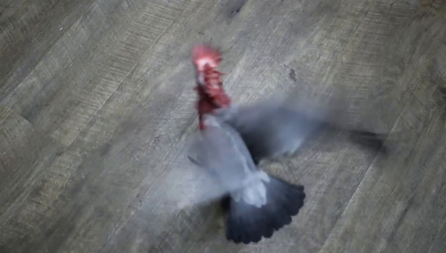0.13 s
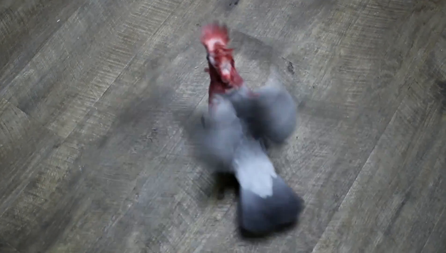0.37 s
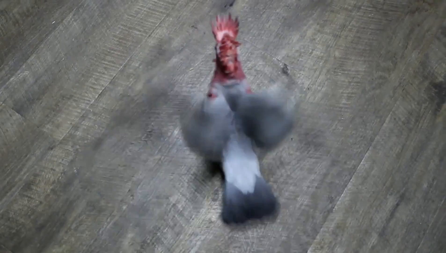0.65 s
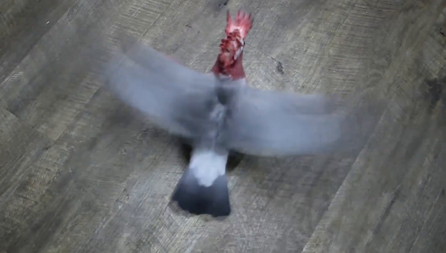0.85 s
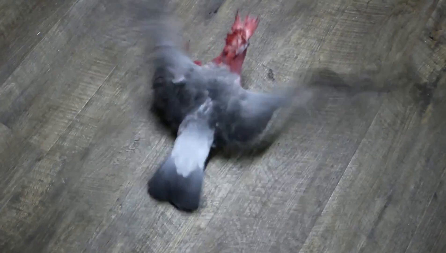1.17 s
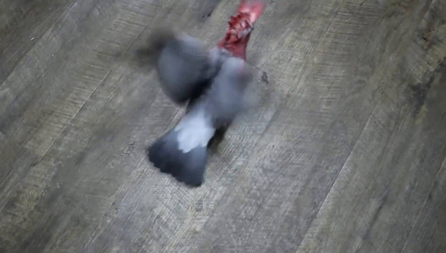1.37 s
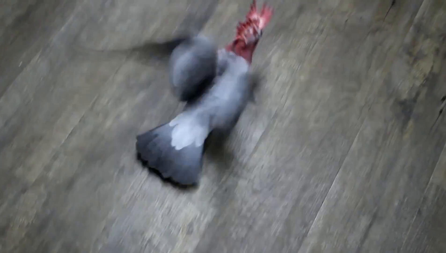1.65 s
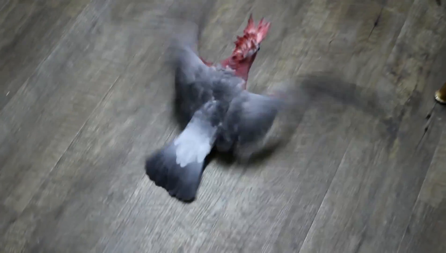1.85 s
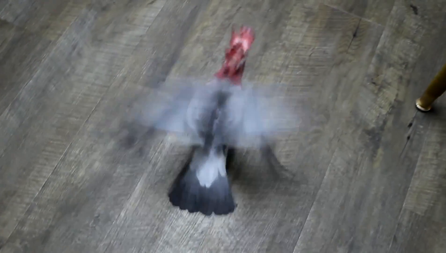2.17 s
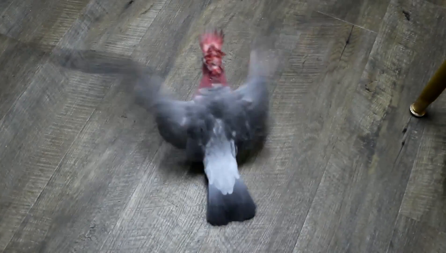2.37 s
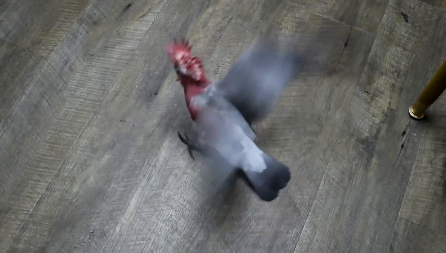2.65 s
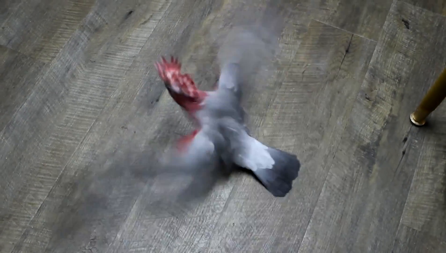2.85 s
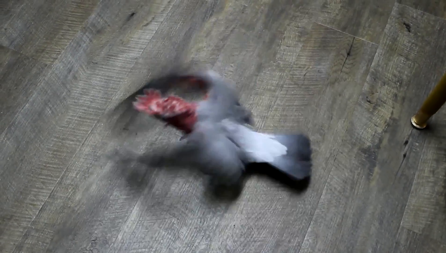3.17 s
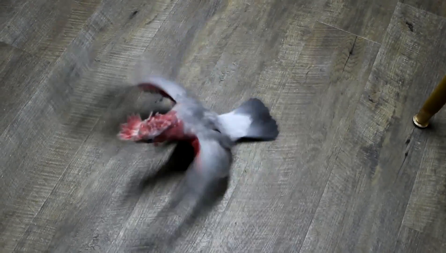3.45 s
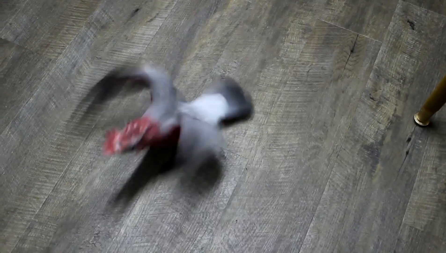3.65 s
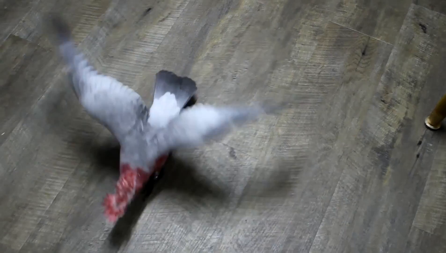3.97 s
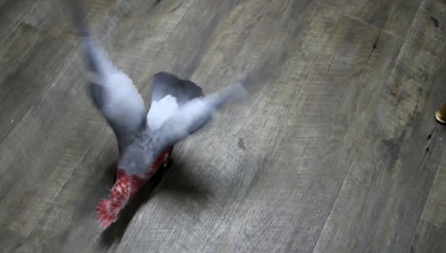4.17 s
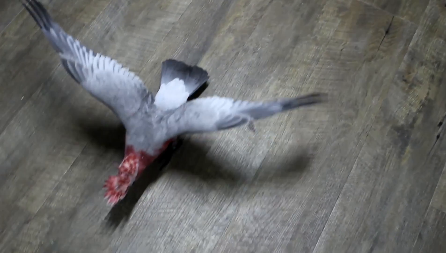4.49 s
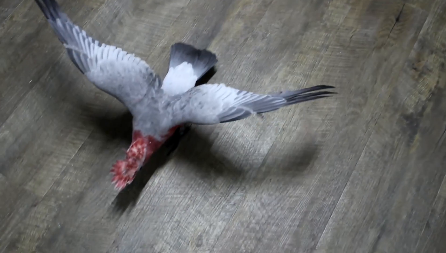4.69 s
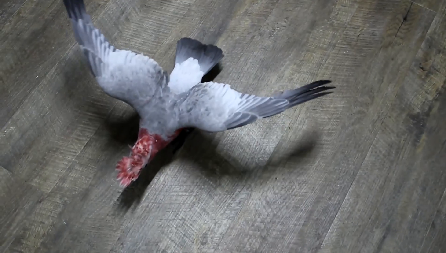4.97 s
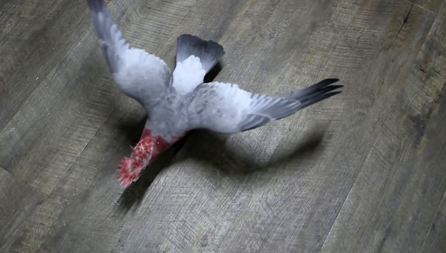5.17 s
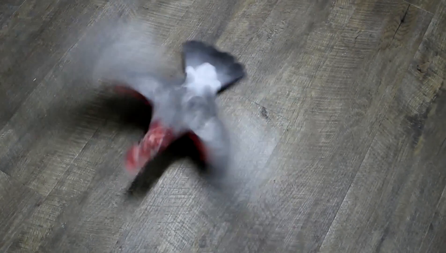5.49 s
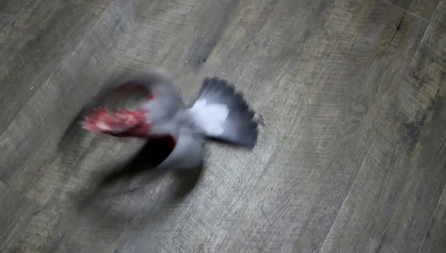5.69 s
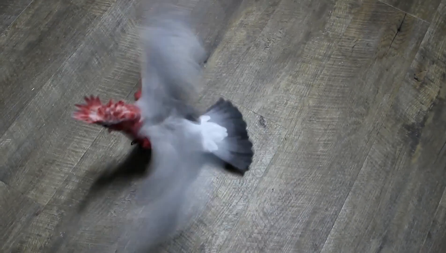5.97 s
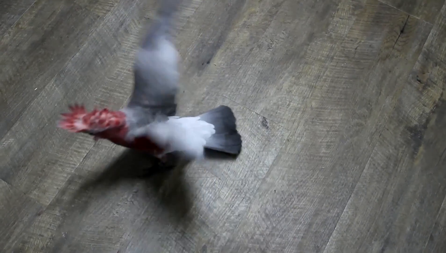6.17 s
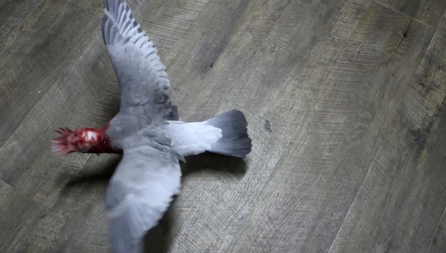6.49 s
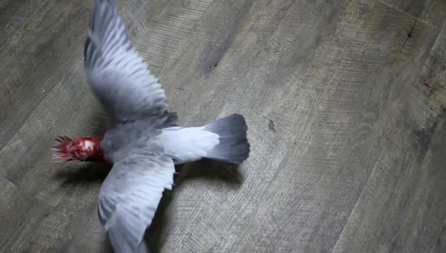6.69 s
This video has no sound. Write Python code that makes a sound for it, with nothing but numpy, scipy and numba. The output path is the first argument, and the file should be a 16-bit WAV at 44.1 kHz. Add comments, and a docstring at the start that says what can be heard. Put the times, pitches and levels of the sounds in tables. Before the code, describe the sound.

Shrill, cracking parrot screeches and quick feathery wing flaps indoors, then a quiet pause, a last rasping squawk and light floor taps.

```python
"""In a bare, ringing room, a young parrot squawks and beats its wings on the wooden floor.
Its voice is a whistle near 3 kHz, built from harmonics, that breaks into half and quarter pitch and rasps.
Wing beats are shaped noise, taps of a wing tip or claws are clicks that ring the boards; an appliance
hums far off. The recorder turns its gain down under the squawks and lets it creep back in the pauses."""
import sys
import numpy as np
from scipy import signal
from scipy.fft import rfft, irfft
from scipy.io import wavfile
from scipy.ndimage import uniform_filter1d, minimum_filter1d
from numba import njit

SR = 44100
rng = np.random.default_rng(int(sys.argv[2]) if len(sys.argv) > 2 else 0)


def wrap_up_sound(samples):
    """Save the sound to the file named by the first command line argument, as 16-bit audio."""
    columns = np.atleast_2d(samples).T
    # keep every value between -1 and 1, then stretch to whole-number steps
    tamed = np.clip(columns, -1, 1)
    steps = np.round(tamed * 32767).astype(np.int16)
    wavfile.write(sys.argv[1], SR, steps)


N = 301644
LEAD = SR // 2   # samples of run-up
TIME = np.arange(-LEAD, N) / SR   # s; sound from just before the start still rings in the room
CUTOFF_HZ = 15687   # top of the voice's harmonics and of the recorder

# room tone, relative spectrum: (f/Hz, level/dB per Hz); AIR_DB is its overall level
AIR = [(15, -47), (25, -4.5), (172, -26.5), (202, -22.5), (394, -12), (543, -18), (588, -23.5), (769, -19),
       (4620, -32), (9520, -35), (15000, -52.5)]
AIR_DB = -71.5
# hum lines of the appliance: (f/Hz, width/Hz, level/dB)
HUM = [(204.6, 15, -77), (540, 1, -69.5), (2342, 40, -90), (4700, 40, -89.5), (9825, 60, -90)]

# registers of the voice, the whistle being the 4th harmonic of a slower cycle, all relative to the squawk:
# (whistle level/dB, its octave level/dB, half-pitch level/dB, quarter-pitch level/dB,
#  lowest tones level/dB, rasp level/dB)
CLEAN = (1, -10, -18, -50, -73, -47)
HALVED = (-0.5, -5, -2, -34, -60.5, -25)
QUARTERED = (1.5, -7.5, -7.5, -2.5, -39, -14)
HARSH = (-18, -17.5, -1, 3.5, -34, 8.5)
FULL = (-5.5, -10.5, -14.5, 2.5, -9, -4)
CRACKED = (-17, -9, -16.5, -4.5, -33.5, -22.5)
CROAK = (-10, -13, -13.5, -5, -7.5, -6.5)
DULLING = 0.2   # dB lost by the octave and half-pitch families per dB below the squawk's peak
# squawks: (octave lift/dB, lowest tones lift/dB, [(t/s, cycle f/Hz, level/dB, register)]);
# the voice glides from row to row
SQUAWKS = [ (11.5, 12, [(-.2, 748, 2.5, HARSH), (-.03, 737.4, -19, QUARTERED), (.02, 720, -29.5, HARSH)]),
           (-3.5, -4.5, [(.213, 542, -28, HALVED), (.243, 743, -7.5, HALVED), (.29, 780.5, -7.5, HALVED),
           (.33, 800.5, -10, HALVED), (.345, 800, -7.5, QUARTERED), (.365, 750, -6.5, CRACKED),
           (.385, 791.6, -15.5, HARSH), (.405, 784, -19, QUARTERED), (.435, 723, -44, QUARTERED)]),
           (7.5, 7.5, [(1.006, 603, -17.5, HARSH), (1.03, 657.5, -14, HALVED), (1.05, 733, -18, HALVED),
           (1.09, 689, -17.5, HALVED), (1.155, 643.4, -21.5, HALVED), (1.188, 512, -30, HALVED)]),
           (14, -0.5, [(1.184, 436, -28, HALVED), (1.22, 424.3, -37.5, HALVED),
           (1.29, 425.5, -35.5, HALVED)]), (3, -2.5, [(1.46, 670, -31.5, HARSH), (1.48, 684.6, -15.5, FULL),
           (1.5, 727, -9.5, CRACKED), (1.516, 784, -9.5, CLEAN), (1.56, 800, -10, CLEAN),
           (1.6, 778, -19, CLEAN), (1.665, 753.7, -7, CLEAN), (1.678, 692, -13.5, CLEAN),
           (1.692, 557, -32.5, CLEAN)]), (6, -5.5, [(1.888, 598, -31, QUARTERED),
           (1.903, 682.4, -12, CLEAN), (1.925, 750.2, -7.5, CLEAN), (1.97, 793.4, -14, QUARTERED),
           (2.02, 775.4, -3.5, CLEAN), (2.035, 744, -19.5, FULL), (2.075, 741.6, -22, CROAK),
           (2.14, 696, -27, CROAK)]), (-1.5, 2.5, [(2.742, 646, -36, HARSH), (2.765, 742.7, -11, HALVED),
           (2.8, 779.4, -5, CLEAN), (2.82, 777, -31.5, CLEAN), (2.845, 793.7, -14, CLEAN),
           (2.872, 786.4, -12.5, CLEAN), (2.885, 774, -10.5, CRACKED), (2.905, 707, -44, HARSH),
           (2.96, 659, -26, CROAK)]), (0.5, 5, [(3.122, 668.5, -40, HARSH), (3.145, 744.2, -10, QUARTERED),
           (3.17, 776.6, -12.5, QUARTERED), (3.2, 775.6, -17.5, QUARTERED), (3.25, 790, -18.5, QUARTERED),
           (3.28, 737, -35.5, CROAK), (3.31, 743, -29.5, CROAK), (3.35, 710, -29, CROAK)]),
           (1, 3, [(3.833, 596, -25, CROAK), (3.85, 651, -21, QUARTERED), (3.875, 708, -13, QUARTERED),
           (3.92, 734, -21, QUARTERED), (3.97, 754.4, -14, QUARTERED), (4.0, 759.6, -33.5, HARSH),
           (4.05, 722, -30, CROAK)]), (1, 1, [(5.496, 577, -44.5, FULL), (5.508, 630, -25.5, FULL),
           (5.52, 693, -27, FULL), (5.53, 738.5, -18.5, QUARTERED), (5.57, 715, -24, HALVED),
           (5.61, 712, -29.5, CLEAN), (5.625, 708, -18, CRACKED), (5.66, 650, -24, CRACKED),
           (5.685, 617, -32, QUARTERED)]), (0, 12.5, [(5.655, 558, -48, HARSH), (5.72, 561.4, -48.5, HARSH),
           (5.92, 566.6, -59, HARSH)])]
# resonances of the throat: (f/Hz, level/dB)
THROAT = [(150, -59), (600, -25.5), (1500, -14.5), (2200, -25.5), (3000, 8), (3800, 3), (6000, -11),
          (7000, -6.5), (9000, -20), (11000, -31), (15000, -63)]

# reverberation of the room: (f/Hz, t60/s); ROOM_DB is its level against the direct sound
ROOM = [(300, .48), (1300, .52), (3500, .56), (6000, .55), (9000, .47), (15000, .3)]
ROOM_DB = -5

# wing beats, before the stroke's envelope: (t/s, air puff level/dB, feather swish level/dB)
BEATS = [(.2, -32, -33), (.341, -56, -62), (.499, -50, -38.5), (.631, -41, -38), (.752, -34, -38.5),
         (.898, -36, -42), (.929, -53, -50.5), (1.009, -38.5, -47), (1.185, -45, -50.5), (1.34, -36, -37.5),
         (1.464, -39.5, -40), (1.6, -58.5, -49.5), (1.729, -47, -39.5), (1.87, -37, -56),
         (1.989, -53, -57.5), (2.121, -48, -50), (2.242, -40.5, -43.5), (2.39, -46, -46),
         (2.59, -46.5, -47), (2.75, -44, -64), (2.89, -76, -42), (3.024, -47.5, -39), (3.119, -56.5, -43.5),
         (3.369, -58.5, -42.5), (3.498, -46.5, -48.5), (3.645, -48.5, -45), (3.83, -57, -38),
         (4.025, -119.5, -33.5), (5.372, -52, -41), (5.407, -54.5, -45), (5.87, -50, -44),
         (5.956, -62, -59)]
BEAT_S = .035   # time constant of a stroke's decay
# relative spectrum of the air puff: (f/Hz, level/dB per Hz)
PUFF = [(40, -13.5), (100, -10), (200, -3.5), (350, -1), (600, -18.5), (1500, -11.5), (3000, -31.5)]
# relative spectrum of the feather swish: (f/Hz, level/dB per Hz)
SWISH = [(180, -62.5), (300, -12.5), (384, 0.5), (663, -2.5), (907, -5), (2110, -3.5), (8020, -7.5),
         (15500, -24)]
# spread wings brush the boards: (t/s, level/dB)
QUIVER = [(4.95, -99), (5.1, -66.5), (5.2, -63), (5.3, -74), (5.4, -62), (5.5, -73.5)]
# relative spectrum of that brushing: (f/Hz, level/dB per Hz)
BRUSH = [(88, -25.5), (150, -2), (404, -4.5), (532, -9), (921, -9.5), (2530, -12.5), (12000, -30.5),
         (15600, -57), (22000, -120)]

# wing tip and claws on the boards, before the gains of click and boards: (t/s, level/dB, hardness f/Hz)
TAPS = [(5.416, -59, 9000), (6.474, -49, 1542), (6.61, -62.5, 9400)]
# resonances of the floorboards: (f/Hz, level/dB, t60/s)
BOARDS = [(236.4, -21.5, .05), (390, -8, 0.06), (770, 0.5, 0.016), (1330, 2, 0.02), (1720, -5, 0.033)]


def amp(db):
    """dB to gain."""
    return 10 ** (np.asarray(db) / 20)


def rms_one(x):
    """Scale to rms 1."""
    return x / np.sqrt(np.mean(x ** 2) + 1e-20)


def at_hz(points, hz):
    """Read a spectrum table on a log-frequency axis."""
    table_hz, value = np.array(points).T
    return np.interp(np.log(np.maximum(hz, 1)), np.log(table_hz), value)


def coloured(spectrum, size=len(TIME)):
    """Noise of the given spectrum, rms 1."""
    hz = np.fft.rfftfreq(size, 1 / SR)
    white = rng.standard_normal(size)
    return rms_one(irfft(rfft(white) * amp(at_hz(spectrum, hz)), size))


def drift(hz, size=len(TIME)):
    """Random wander, rms 1: noise through a two-pole lowpass."""
    r = np.exp(-2 * np.pi * hz / SR)
    white = rng.standard_normal(size + 4000)
    return rms_one(signal.lfilter([1], [1, -2 * r, r * r], white)[4000:])   # skip the filter's settling


def ring(x, hz, width_hz):
    """A resonance; a unit click rings at about height 1."""
    r, w = np.exp(-np.pi * width_hz / SR), 2 * np.pi * hz / SR
    return signal.lfilter([0, np.sin(w)], [1, -2 * r * np.cos(w), r * r], x + 1e-18)


def room_tone():
    """Steady air noise, with hum lines made of noise through narrow resonances."""
    white = rng.standard_normal(len(TIME))
    hum = sum(amp(db) * rms_one(ring(white, hz, width_hz)) for hz, width_hz, db in HUM)
    return amp(AIR_DB) * coloured(AIR) + hum


def squawk(bright_db, deep_db, rows, jitter=.22, wobble=.007, flutter_db=4.0, edge_s=.007):
    """Harmonics of the cycle in families, plus breath noise that swells once a cycle."""
    s, cycle_hz, row_db, registers = zip(*rows)
    span = (TIME >= s[0]) & (TIME < s[-1])
    t = TIME[span]
    hz = np.interp(t, s, cycle_hz)
    whistle, octave, half, quarter, low, rasp = [
        np.interp(t, s, family + row_db) for family in np.transpose(registers)]
    dull_db = DULLING * (max(row_db) - np.interp(t, s, row_db))
    octave = octave + bright_db - dull_db
    half = half - dull_db
    low = low + deep_db

    # the more rasp, the more the cycle stumbles
    strongest = np.max([whistle, octave, half, quarter], axis=0)
    unsteady = jitter * np.clip(amp(rasp - strongest), 0, 1)
    wobbly_hz = hz * (1 + wobble * drift(30, len(t)))
    phase = 2 * np.pi * np.cumsum(wobbly_hz) / SR + unsteady * drift(330, len(t))

    out = amp(rasp) * coloured(THROAT, len(t)) * (1 + 0.3 * np.cos(phase))   # breath
    for k in range(1, 21):
        # each family keeps its level at an anchor harmonic; the throat shapes the others around it
        if k in (1, 3):
            family_db, anchor = low, 1
        elif k == 2:   # the stronger of the half-pitch and lowest families carries it
            family_db, anchor = np.maximum(half - 19, low - 1.5), 2
        elif k == 4:
            family_db, anchor = whistle, 4
        elif k % 4 == 0:
            family_db, anchor = octave, 8
        elif k % 2 == 0:
            family_db, anchor = half, 6
        else:
            family_db, anchor = quarter, 5
        shape_db = at_hz(THROAT, k * hz) - at_hz(THROAT, anchor * hz)
        flicker_db = flutter_db * (drift(50, len(t)) - 2)
        rough_db = 9.6 * unsteady * drift(150, len(t))
        tone = np.sqrt(2) * np.sin(k * phase + rng.uniform(0, 2 * np.pi)) * (k * hz < CUTOFF_HZ)
        out += amp(family_db + shape_db + flicker_db + rough_db) * tone

    voice = np.zeros(len(TIME))
    voice[span] = out * np.clip(np.minimum(t - s[0], s[-1] - t) / edge_s, 0, 1)
    return voice


def room(x, first_s=0.0077):
    """Dense reflections: noise that dies band by band, starting after a short gap."""
    t, tail = np.arange(SR) / SR, 0
    edges_hz = np.geomspace(60, 18000, 12)
    for low, high in zip(edges_hz, edges_hz[1:]):
        bandpass = signal.butter(2, [low, high], "band", fs=SR, output="sos")
        band = signal.sosfilt(bandpass, rng.standard_normal(SR))
        tail = tail + band * amp(-60 * t / at_hz(ROOM, np.sqrt(low * high)))
    tail = tail * (t > first_s)
    return signal.fftconvolve(x, tail / np.sqrt(np.sum(tail ** 2)))[:len(x)]


def wings(rise=.8, crackle_db=4.5):
    """Each beat pushes a low puff of air and a crackly swish of feathers; spread wings brush the boards."""
    puff, swish = np.zeros((2, len(TIME)))
    for s, puff_db, swish_db in BEATS:
        span = (TIME >= s) & (TIME < s + 8 * BEAT_S)
        t = TIME[span] - s
        stroke = (1 - np.exp(-t / (rise * BEAT_S))) * np.exp(-t / BEAT_S)
        puff[span] += amp(puff_db) * stroke
        swish[span] += amp(swish_db) * stroke
    swish *= amp(crackle_db * drift(300))
    brush = amp(np.interp(TIME, *np.transpose(QUIVER)))
    return puff * coloured(PUFF) + swish * coloured(SWISH) + brush * coloured(BRUSH)


def taps():
    """A click, softened by the contact, plus the boards that it sets ringing."""
    clicks = np.zeros(len(TIME))
    t = np.arange(200) / SR
    for s, level_db, hard_hz in TAPS:
        at = LEAD + round(s * SR)
        contact = t * np.exp(-2 * np.pi * hard_hz * t)
        clicks[at:at + 200] += amp(level_db) * contact / contact.sum()
    # a resonance's width follows from its t60
    boards = sum(amp(db) * ring(clicks, hz, np.log(1000) / np.pi / t60) for hz, db, t60 in BOARDS)
    return amp(28.5) * clicks + boards


def scene():
    """Bird, room and background, one channel."""
    background = room_tone()
    bird = sum(squawk(*call) for call in SQUAWKS) + wings() + taps()
    return (bird + amp(ROOM_DB) * room(bird) + background)[None, LEAD:]


@njit
def follow(wanted_db, start_db, fall, rise_db):
    """The gain sinks towards a lower wanted value and climbs at a fixed pace to a higher one."""
    gain_db, now = np.empty_like(wanted_db), start_db
    for i in range(len(wanted_db)):
        now += max(min(wanted_db[i] - now, rise_db), 0) + fall * min(wanted_db[i] - now, 0)
        gain_db[i] = now
    return gain_db


def record(dry):
    """Slow automatic gain, a fast peak limiter, steep top cut."""
    aim_db, most_db, fall_s, rise_db_per_s = -35, 24, 0.36, 13
    level_db = 10 * np.log10(uniform_filter1d(dry[0] ** 2, size=1000) + 1e-12)
    wanted_db = np.clip(aim_db - level_db, 0, most_db)
    gain_db = follow(wanted_db, 0., 1 / (fall_s * SR), rise_db_per_s / SR)
    loud = dry * amp(gain_db)
    # the limiter ducks around each peak above full scale
    limit = minimum_filter1d(1 / np.maximum(np.abs(loud), 1), size=301)
    loud = loud * uniform_filter1d(limit, size=151)
    top_cut = signal.cheby2(22, 70, CUTOFF_HZ + 150, fs=SR, output="sos")
    return np.clip(signal.sosfilt(top_cut, loud), -1, 1)


dry = scene()
out = record(dry)
wrap_up_sound(out)
```